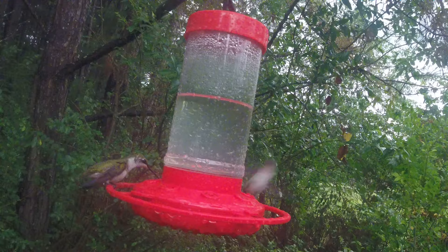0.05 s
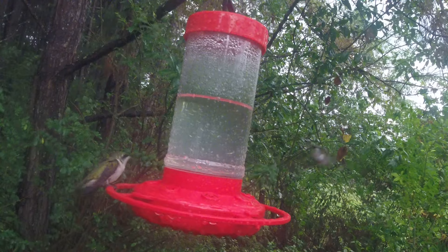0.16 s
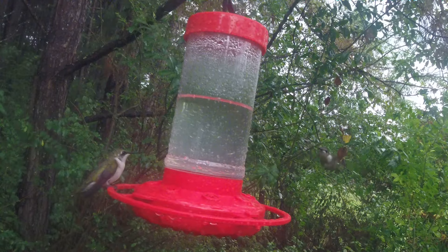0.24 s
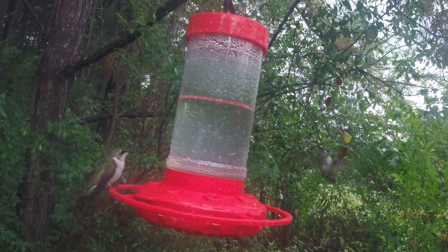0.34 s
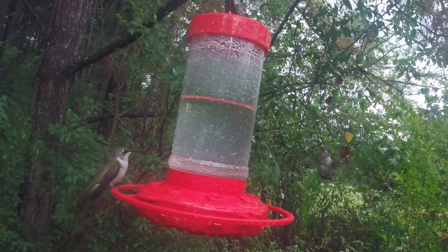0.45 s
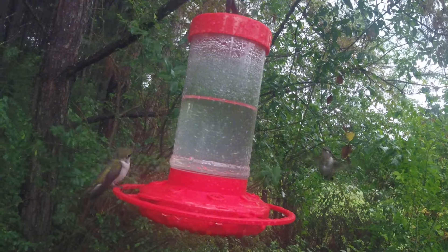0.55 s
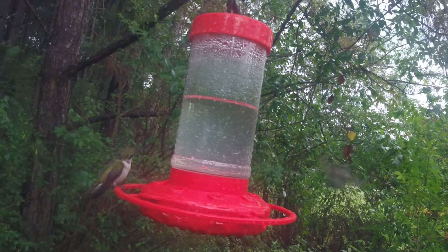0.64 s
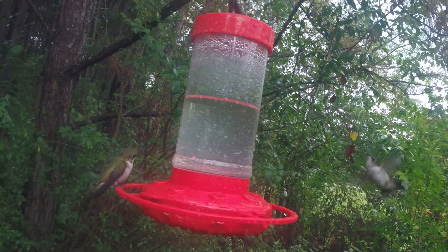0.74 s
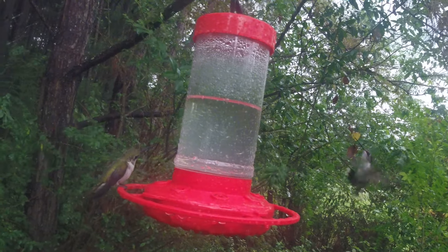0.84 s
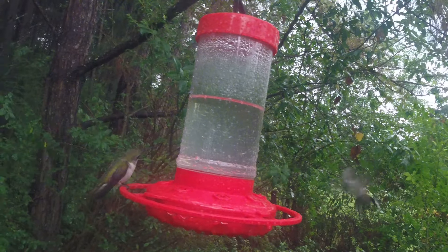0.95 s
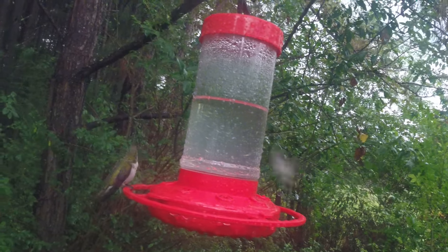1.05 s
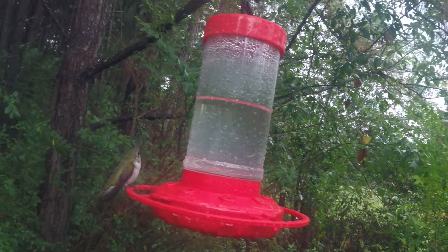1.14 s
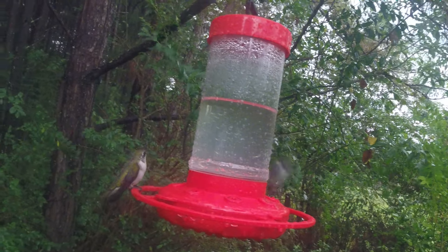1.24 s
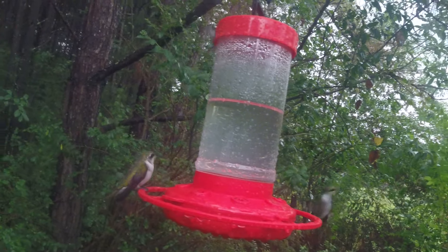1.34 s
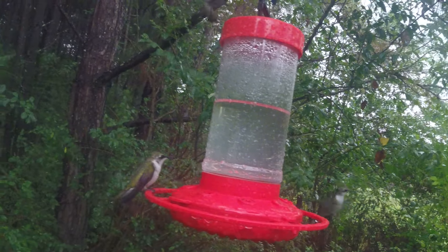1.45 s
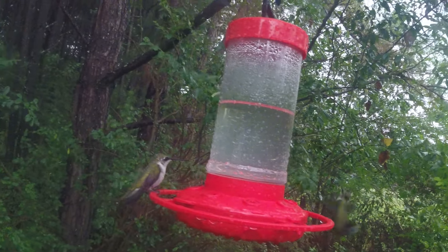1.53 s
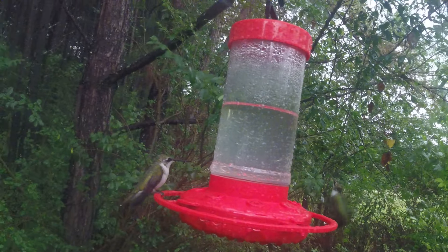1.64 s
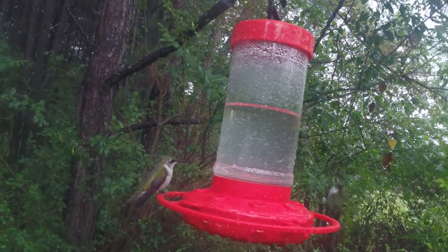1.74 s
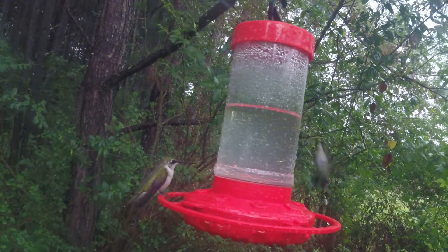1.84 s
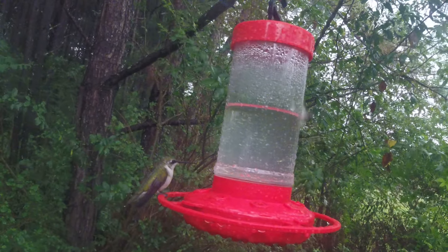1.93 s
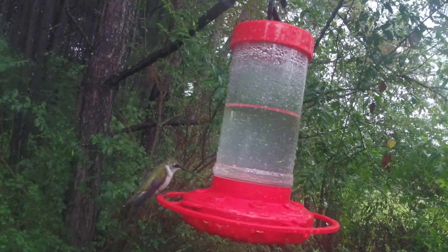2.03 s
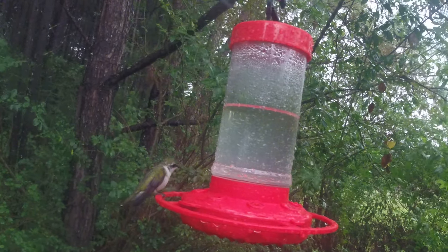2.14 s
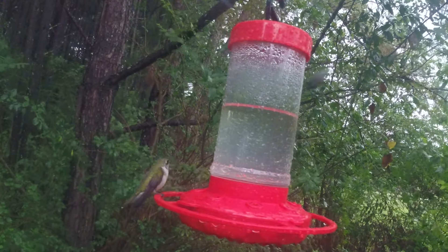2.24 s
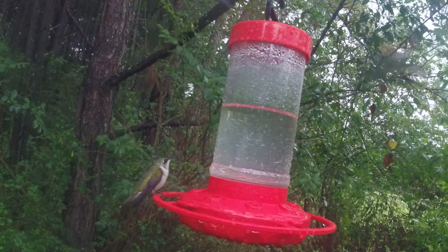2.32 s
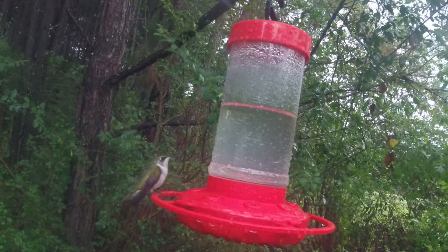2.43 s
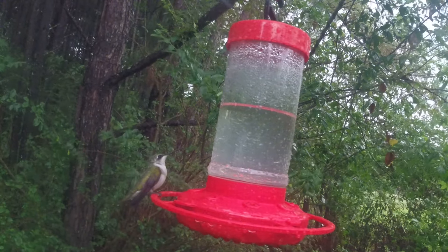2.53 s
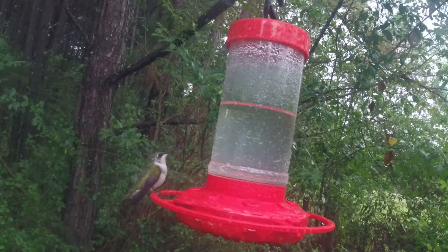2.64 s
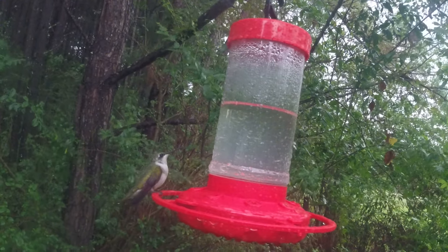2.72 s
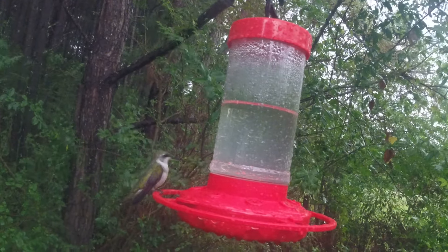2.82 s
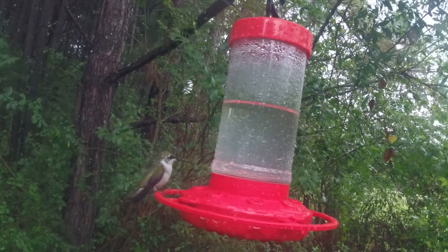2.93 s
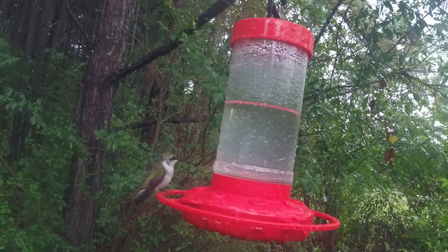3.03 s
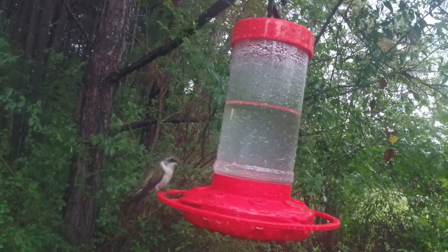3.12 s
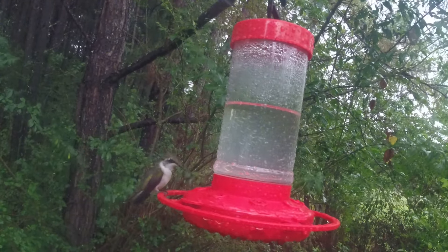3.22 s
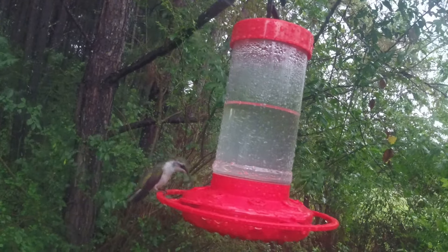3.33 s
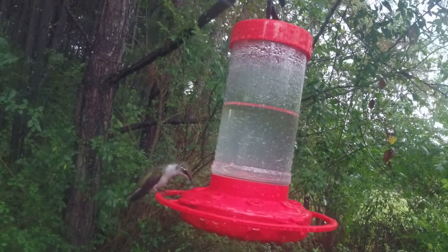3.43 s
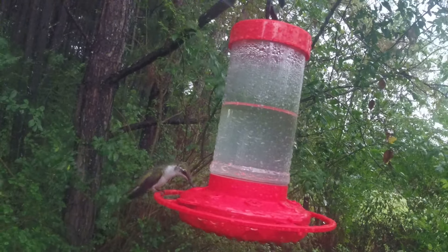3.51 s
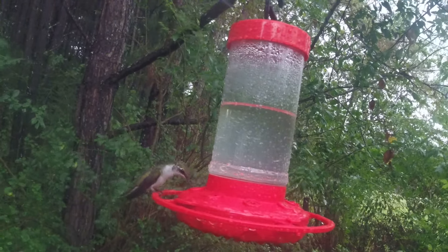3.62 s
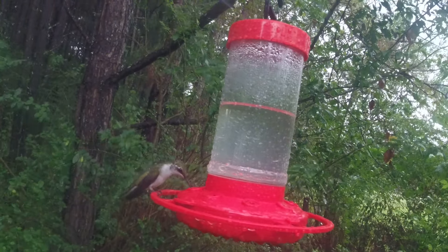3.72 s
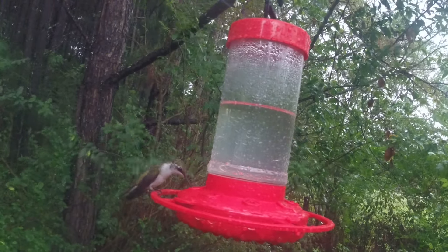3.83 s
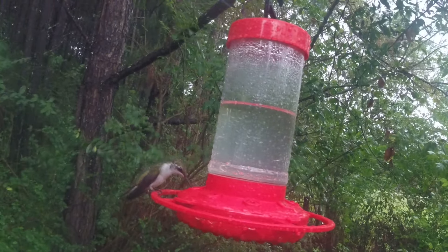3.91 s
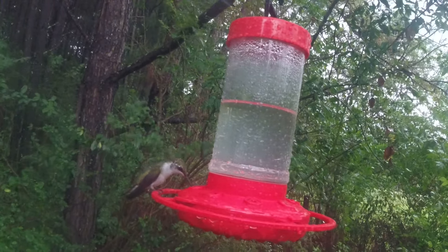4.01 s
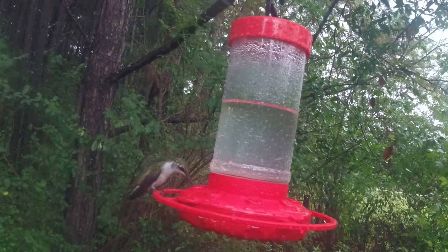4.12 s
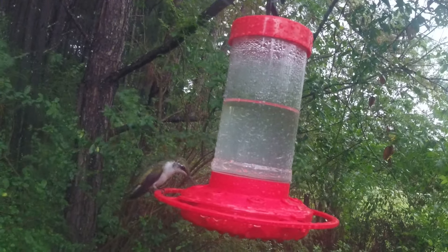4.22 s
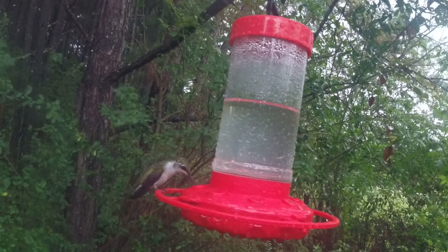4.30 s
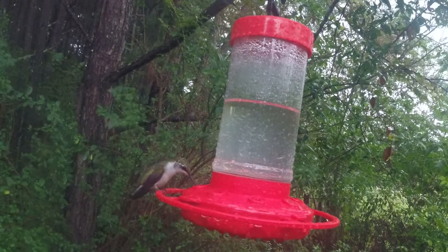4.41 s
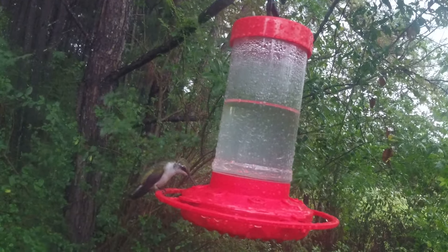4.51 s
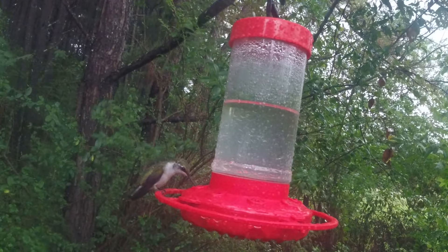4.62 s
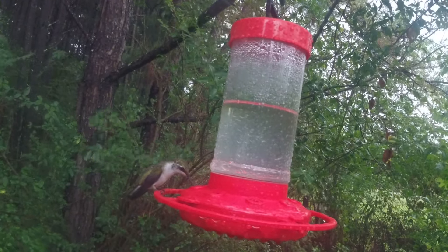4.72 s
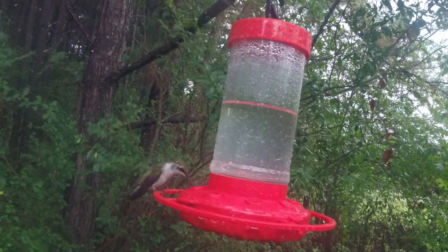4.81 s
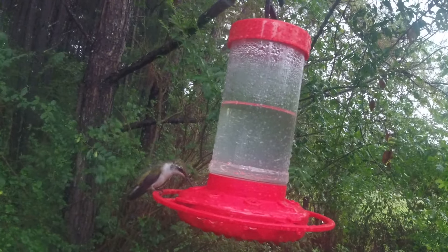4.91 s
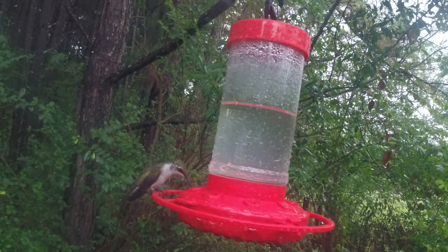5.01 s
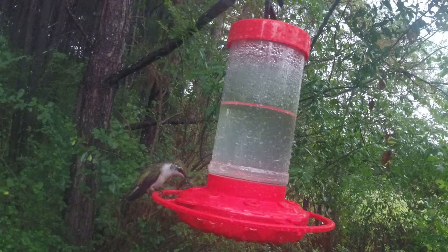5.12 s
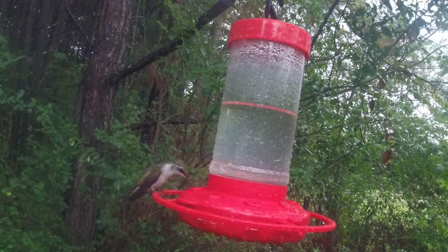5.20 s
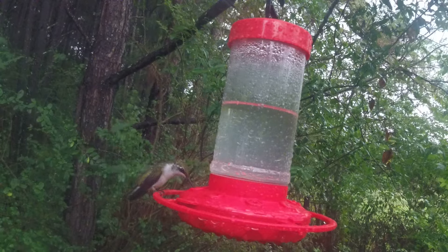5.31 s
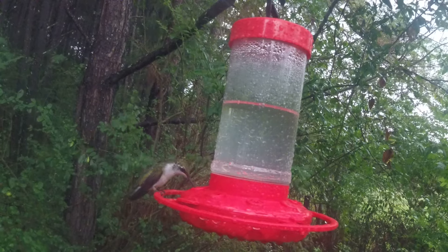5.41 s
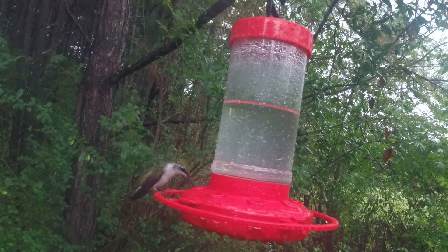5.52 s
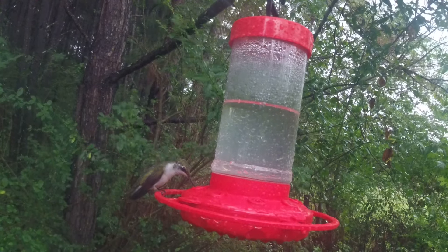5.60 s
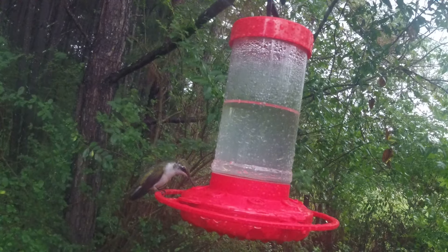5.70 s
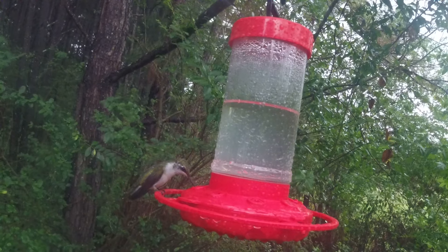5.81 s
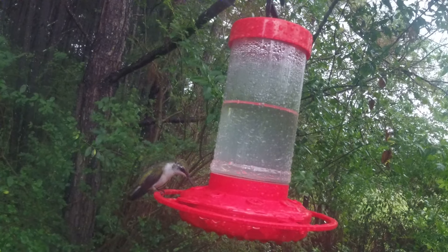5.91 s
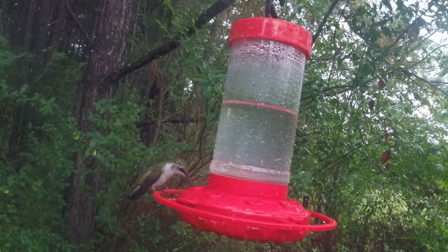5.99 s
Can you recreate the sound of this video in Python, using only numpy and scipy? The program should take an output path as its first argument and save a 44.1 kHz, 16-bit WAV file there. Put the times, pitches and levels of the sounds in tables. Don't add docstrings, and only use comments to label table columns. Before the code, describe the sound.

Hummingbird wings hum and buffet a close microphone in light rain, drops tick on leaves and plastic, a near bird chatters, another trills far off.

```python
import sys
import numpy as np
from scipy import signal
from scipy.fft import rfft, irfft, next_fast_len
from scipy.io import wavfile
from scipy.ndimage import uniform_filter1d, minimum_filter1d, map_coordinates

SR = 44100
rng = np.random.default_rng(int(sys.argv[2]) if len(sys.argv) > 2 else 0)


def ratio(d):
    e = np.asarray(d, float) / 20
    return 10 ** e


def transcribe(signal):
    frames = np.atleast_2d(signal).T
    limited = np.clip(frames, -1, 1)
    pcm = np.round(limited * 32767).astype(np.int16)
    wavfile.write(sys.argv[1], SR, pcm)


N = 266849
TIME = np.arange(N) / SR


def unit(x):
    return x / np.sqrt(np.mean(np.abs(x) ** 2) + 1e-20)


def along(points, hz):
    point_hz, level_db = np.transpose(points)
    return np.interp(np.log(hz + 1), np.log(point_hz + 1), level_db)


def curves(rows):
    start_s, *columns = np.transpose(rows)
    return [np.interp(TIME, start_s, column) for column in columns]


def swells(start_s, half_s):
    away_s = TIME - np.asarray(start_s)[:, None]
    return np.exp(-(away_s / np.reshape(half_s, (-1, 1))) ** 2)


def wobble(rate):
    knots = rng.standard_normal(int(N * 400 / SR))
    return unit(map_coordinates(knots, [TIME * min(rate, 390)]))


def noise(spectrum):
    size = next_fast_len(N + 8192)
    white = rfft(rng.standard_normal(size))
    colour = ratio(along(spectrum, np.fft.rfftfreq(size, 1 / SR)))
    return unit(irfft(white * colour, size)[:N])


def evened(x, seconds, share):
    power = np.abs(uniform_filter1d(np.abs(x) ** 2, max(int(seconds * SR), 2))) + .02
    return unit(x * power ** (-np.clip(share, 0, 1) / 2))


def butter(order, hz, kind):
    return signal.butter(order, hz, kind, fs=SR, output="sos")


def add(x, start_s, piece):
    seat = x[max(round(start_s * SR), 0):][:len(piece)]
    seat += piece[:len(seat)]


def echoes(x, t60, wet_db):
    t = np.arange(SR // 4) / SR
    tail = ratio(-60 * t / t60) * rng.standard_normal(len(t))
    tail /= np.linalg.norm(tail)
    return x + ratio(wet_db) * signal.fftconvolve(np.pad(x, (200, 0)), tail)[:N]


# pitch_hz [Hz], level_db [dB per Hz]
HUM_COLOUR = [(56, -53), (95, -57), (107, -21), (142, 0.5), (183, -6), (228, -4.5), (340, -18.5),
              (440, -33.5), (750, -120)]
# pitch_hz [Hz], level_db [dB per Hz]
HEAVE_COLOUR = [(10, -17), (20, -2.5), (45, -4.5), (65, -5.5), (85, -22), (200, -120)]
# pitch_hz [Hz], level_db [dB per Hz]
THUD_COLOUR = [(25, -120), (50, -34), (68, 2.5), (112, -5), (140, -9), (300, -26), (600, -120)]
# pitch_hz [Hz], level_db [dB per Hz]
FLUTTER_COLOUR = [(130, -120), (240, -20), (320, 2.5), (450, -3), (650, -15.5), (1000, -47.5)]


def air():
    hum_db, hum_hz, heave_db, thud_db, flutter_db = flow()
    eddies = evened(wobble(60) + 1j * wobble(60), seconds=.06, share=.7)
    swirl = evened(wobble(150) + 1j * wobble(150), seconds=.15, share=.1)
    turns = 2j * np.pi * np.cumsum(hum_hz) / SR
    shed = unit(np.real(eddies * np.exp(turns) + .6 * swirl * np.exp(.9 * turns)))

    narrow = np.clip((np.maximum(hum_db, heave_db + 9) + 42) / 20, .05, .95)
    broad = evened(noise(HUM_COLOUR), seconds=.15, share=.68)
    hum = ratio(hum_db) * (np.sqrt(narrow) * shed + np.sqrt(1 - narrow) * broad)
    hum = signal.sosfiltfilt(butter(6, 130, "highpass"), hum)
    octave = signal.sosfiltfilt(butter(4, 220, "highpass"), hum ** 2)

    heave = ratio(heave_db) * evened(noise(HEAVE_COLOUR), seconds=.11, share=.45)
    thud = ratio(thud_db) * evened(noise(THUD_COLOUR), seconds=.093, share=1)
    flutter = ratio(flutter_db + 2.1 * wobble(25)) * noise(FLUTTER_COLOUR)
    return hum + .34 * octave + heave + thud + flutter


# start_s [s], flow_db [dB], pitch_hz [Hz], gust_db [dB]
AIR_FLOW = [(0, -25, 170.6, -75), (0.3, -32, 169.4, -62), (0.6, -31, 179.1, -56), (0.85, -34, 191, -59),
            (1.1, -37.5, 178.4, -59), (1.4, -25.5, 200, -48), (1.62, -26, 152, -42),
            (1.85, -23.5, 200.9, -38), (2.1, -23, 199.2, -30), (2.28, -17, 255.4, -27.5),
            (2.45, -20, 148.5, -37), (2.65, -28, 163.7, -25), (2.92, -37, 146.2, -43),
            (3.1, -37.5, 145.3, -26.5), (3.36, -40, 151.4, -45.5), (4.0, -43.5, 176.7, -52.5),
            (5.0, -42, 171.2, -61), (6.05, -43, 180.4, -71)]
# start_s [s], lift_db [dB], half_width_s [s], pitch_hz [Hz]
WING_PUFFS = [(0.09, -5, 0.037, 171.1), (0.317, 8.5, .012, 200.5), (0.44, 3.5, .025, 199.8),
              (0.6, -3, .015, 189.6), (1.88, 3, 0.025, 199.4), (2.28, 0.5, 0.022, 259.9),
              (0.128, 8.5, 0.02, 177.4), (0.191, 6, 0.036, 201.3), (0.5, 0, 0.043, 170.5),
              (0.672, 6.5, 0.053, 225.6), (0.83, -10.5, 0.028, 228.9), (1.025, 4.5, 0.04013, 215.6),
              (1.14, -0.5, .03, 218.3), (1.208, 10.5, 0.024, 222.2), (1.259, -6, 0.012, 216.5),
              (1.307, 14, 0.03, 195.5), (1.447, 14.5, 0.034, 204.4), (1.59, 5.5, 0.048, 156.8),
              (1.659, -6, 0.025, 149), (1.739, 3, 0.046, 187), (1.802, -10.5, 0.011, 209),
              (2.0, 2.5, 0.017, 211.8), (2.03, 5, 0.016, 211.1), (2.225, 5.5, 0.031, 245.4),
              (2.351, 6.5, 0.0308, 186.7), (2.57, -9, 0.045, 148.8), (2.67, 6, .025, 171.1),
              (2.77, 2, 0.037, 137), (3.03, 8, 0.042, 137), (5.17, 5.5, .03, 178.2),
              (5.41, 3.5, 0.059, 155.8), (5.729, 3, 0.054, 194.4)]
# start_s [s], lift_db [dB], quick_over_slow_db [dB]
GUST_SHOVES = [(0.12, 6, -12), (0.5, 0, -6), (1.3, -11, -8), (1.8, 2.5, 15), (2.029, -2, 22),
               (2.17, 0.5, 0), (2.22, -4, 9), (2.351, 6, -1), (2.4, -12, 13), (2.45, 6.5, -16),
               (2.57, -1, 10), (3.029, 5.5, 10), (3.19, 3.5, -8), (3.759, -4, -23), (4.37, -3, -11),
               (4.59, -5, -1), (5.17, 1, -6), (5.64, -5, 0)]
# start_s [s], flutter_lift_db [dB]
FEATHERS_NEAR = [(0, 8), (0.6, 3), (1.1, 2), (1.4, 0.5), (1.7, 1), (2.2, -0.5), (2.6, 1), (3.2, 5),
                 (4.0, 0.5), (6.05, 0.5)]


def flow():
    flow_db, hum_hz, gust_db = curves(AIR_FLOW)
    start_s, lift_db, half_s, puff_hz = np.transpose(WING_PUFFS)
    bells = swells(start_s, half_s)
    hum_db = flow_db + lift_db @ bells
    pull = np.clip(1.5 * bells, 0, 1)
    pulled = pull.sum(0)
    hum_hz = hum_hz + (puff_hz @ pull - hum_hz * pulled) / np.maximum(pulled, 1)

    start_s, lift_db, quick_db = np.transpose(GUST_SHOVES)
    bells = swells(start_s, half_s=.042)
    gust_db = gust_db + lift_db @ bells
    tip_db = (-3 + quick_db @ bells) / 2

    flutter_db = -56 + .29 * (hum_db + 41.5) + .0974 * (hum_hz - 170) + curves(FEATHERS_NEAR)[0]
    return hum_db, hum_hz, gust_db - tip_db, gust_db + tip_db, flutter_db


# start_s [s], peak_db [dB], pitch_hz [Hz], rattle_db [dB], sharpness_db [dB]
NEAR_DROPS = [(0.294, -34, 1490, -10, -3), (0.565, -26.5, 1152, 1.5, -18), (0.7472, -32, 1350, -4, -4),
              (0.856, -18, 1300, -14, 2), (0.883, -34, 1119, -8, -1), (0.895, -27, 970, -11, -3),
              (0.952, -31.5, 974, -5, -2.5), (0.979, -35, 968, -5.5, 1.5), (1.079, -29, 2245, -0.5, -1),
              (1.102, -36, 2142, -4, 1), (1.125, -22.5, 1667, -5, -2.5), (1.422, -34, 1490, -9, 6),
              (1.761, -35, 1300, -6, 4.5), (1.929, -26, 1099, -11.5, 5.5), (2.227, -28, 3001, -12, 6),
              (2.252, -37, 1500, 1, 0), (2.459, -27.5, 1038, -4.5, 2.5), (2.72, -32.5, 944.4, -7, 1),
              (2.804, -30.5, 2380, -22, 5.5), (2.8567, -30, 2396, -9, 4), (3.035, -13.5, 1150, -12.5, -0.5),
              (3.125, -37.5, 917, -1, 1), (3.181, -26.5, 1651, -4.5, -5), (3.504, -30.5, 798, -10, -20),
              (4.044, -36.5, 913, -4, 1.5), (4.967, -35, 1320, -3, 1), (5.047, -35, 1876, -9, -1),
              (5.242, -22.5, 1490, -10, 5), (5.515, -32, 1638, -8, -11), (5.753, -32, 2140, -4.5, -1.5)]
# start_s [s], peak_db [dB]
SMALL_DROPS = [(0.389, -47), (0.625, -39), (0.658, -39), (0.7739, -35), (1.111, -37), (1.142, -32.5),
               (1.169, -36), (1.503, -41), (1.545, -42), (1.395, -48), (1.818, -48), (2.152, -44),
               (2.128, -40), (1.481, -40), (1.642, -39), (1.711, -41), (1.835, -38.5), (1.899, -37),
               (1.955, -36.5), (2.159, -35), (2.429, -40), (2.464, -48), (2.777, -44), (2.8015, -51),
               (2.866, -47), (3.02, -45.5), (3.0325, -37), (3.046, -37), (3.606, -39), (3.661, -39),
               (4.097, -42), (4.809, -38.5), (4.9493, -45), (5.017, -44), (5.253, -36.5), (5.333, -49),
               (5.555, -42), (5.747, -46), (5.899, -55), (5.991, -45)]


def drops():
    out, t = np.zeros(N), np.arange(SR // 20) / SR
    leaf_band = butter(2, [250, 2600], "bandpass")
    spray_band = butter(2, [4000, 11000], "bandpass")
    soft = butter(2, 2000, "lowpass")
    late = np.clip(t - .0012, 0, 1)
    small = [(s, db, 2000 * ratio(rng.normal(0, 2.9)), -.5, 0) for s, db in SMALL_DROPS]
    rattle_fade = ratio(-60 * late / .018) + .17 * ratio(-60 * late / .1)
    rattle_fade *= 1 - np.exp(-late / .0003)
    spray_fade = ratio(-60 * late / .0029) * (late > -.0003)

    for start_s, peak_db, ring_hz, rattle_db, sharp_db in NEAR_DROPS + small:
        u = (t - .0014) * np.sqrt(ring_hz * 3800)
        push = np.cos(1.5 * np.pi * u - .6) * np.exp(-(u / .4) ** 2)
        push += .2 * np.sin(.6 * np.pi * u) * np.exp(-(u / 1.5) ** 2)
        ring = .09 * np.sin(2 * np.pi * ring_hz * late) * ratio(-60 * late / .015)
        hiss = rng.standard_normal((2, len(t)))
        rattle = unit(signal.sosfilt(leaf_band, hiss[0])) * rattle_fade
        spray = unit(signal.sosfilt(spray_band, hiss[1])) * spray_fade
        spray_db = -17 - .95 * (peak_db + 40)
        hit = push + ring + ratio(rattle_db - 4) * rattle + ratio(spray_db) * spray
        body = signal.sosfiltfilt(soft, hit)
        add(out, start_s, ratio(peak_db) * (body + ratio(sharp_db) * (hit - body)))
    return out


# start_s [s], pitch_hz [Hz], level_db [dB], t60_s [s]
PLASTIC_RINGS = [
    (3.0374, 2037, -29.5, 0.022),
    (0.565, 1092, -36, 0.021),
    (0.857, 1290, -38, 0.04),
    (1.931, 940, -40, 0.062),
    (5.049, 709, -35, 0.027),
    (5.048, 1834, -41, 0.047),
    (5.754, 2170, -37, 0.015),
]


def feeder():
    out, t = np.zeros(N), np.arange(SR // 10) / SR
    for start_s, pitch_hz, level_db, t60 in PLASTIC_RINGS:
        add(out, start_s, ratio(level_db - 60 * t / t60) * np.sin(2 * np.pi * pitch_hz * t))
    return out


# start_s [s], pitch_hz [Hz], level_db [dB]
HIGH_PEEP = [(2.432, 6940, -60), (2.437, 6975, -45), (2.455, 7010, -41), (2.462, 7080, -36),
             (2.474, 7075, -37), (2.478, 7060, -40), (2.482, 7050, -36), (2.490, 7020, -42),
             (2.495, 6950, -50)]
# start_s [s], length_s [s], start_hz [Hz], end_hz [Hz], level_db [dB]
QUICK_FLICKS = [
    (2.494, 0.0072, 6900, 2000, -33),
    (2.537, 0.0057, 1890, 6700, -30.5),
    (2.5535, 0.0075, 1890, 6540, -29),
]
# start_s [s], length_s [s], start_hz [Hz], end_hz [Hz], level_db [dB]
HOOKED_CLICKS = [
    (2.9245, 0.0068, 1930, 6270, -33),
    (2.939, 0.0082, 2110, 6280, -30),
    (2.9545, 0.006, 3400, 6360, -27.5),
    (2.969, 0.0038, 2340, 6490, -30),
    (2.9845, 0.0062, 2770, 6500, -30),
]


def chatter():
    song = whistle(HIGH_PEEP, rough_db=.3, waver_hz=0) + slurs(bright_db=2.5)
    song += notes(QUICK_FLICKS[:1], knee=.35, reach=.12, rise=.075, fall=.3, bright_db=0)
    song += notes(QUICK_FLICKS[1:], knee=.75, reach=.86, rise=.074, fall=.35, bright_db=4)
    song += notes(HOOKED_CLICKS, knee=.394, reach=.9, rise=.045, fall=.67, bright_db=1.5)
    return echoes(song, t60=.09, wet_db=-19)


def notes(rows, knee, reach, rise, fall, bright_db):
    out = np.zeros(N)
    for start_s, length_s, start_hz, end_hz, level_db in rows:
        knee_hz = start_hz + reach * (end_hz - start_hz)
        u = np.linspace(0, 1, int(length_s * SR))
        pitch_hz = np.interp(u, [0, knee, 1], [start_hz, knee_hz, end_hz])
        pitch_hz = uniform_filter1d(pitch_hz, size=len(u) // 4, mode="nearest")
        shape = np.clip(u / rise, 0, 1) * np.clip((1 - u) / fall, 0, 1)
        add(out, start_s, ratio(level_db) * voice(pitch_hz, bright_db) * shape)
    return out


# start_s [s], pitch_hz [Hz], level_db [dB]
NASAL_SLURS = [
    [(2.737, 2750, -50), (2.741, 2550, -38), (2.750, 2150, -36), (2.758, 2000, -35), (2.7615, 1750, -38),
     (2.763, 1550, -52)],
    [(2.818, 2700, -48), (2.823, 2340, -32), (2.832, 2280, -31), (2.836, 2050, -34), (2.841, 1750, -37),
     (2.844, 1400, -50)],
    [(2.568, 2000, -50), (2.5695, 2000, -35), (2.571, 1950, -37), (2.573, 1900, -52)],
]


def slurs(bright_db):
    out = np.zeros(N)
    for rows in NASAL_SLURS:
        s, pitch_hz, level_db = np.transpose(rows)
        t = np.arange(s[0], s[-1], 1 / SR)
        tone = voice(np.interp(t, s, pitch_hz), bright_db)
        add(out, s[0], ratio(np.interp(t, s, level_db)) * tone)
    return out


OVERTONE_LEVELS = [-5.5, -10, -19, -19]
# pitch_hz [Hz], level_db [dB]
THROAT_COLOUR = [(1500, 0), (4000, -5.5), (5200, -6), (6200, -0.5), (7200, -15), (9000, -10.5),
                 (14000, -21)]


def voice(pitch_hz, bright_db):
    phase = 2 * np.pi * np.cumsum(pitch_hz) / SR
    out = np.zeros(len(phase))
    for k, level_db in enumerate([0] + [db + bright_db for db in OVERTONE_LEVELS], 1):
        level = ratio(level_db + along(THROAT_COLOUR, k * pitch_hz))
        out += level * (k * pitch_hz < SR / 3) * np.sin(k * phase)
    return out


def whistle(rows, rough_db, waver_hz):
    pitch_hz, level_db = curves(rows)
    phase = 2 * np.pi * np.cumsum(pitch_hz + waver_hz * wobble(120)) / SR
    sounding = (TIME > rows[0][0]) & (TIME < rows[-1][0])
    tone = np.sin(phase) + .025 * np.sin(2 * phase)
    return np.sqrt(2) * ratio(level_db + rough_db * wobble(90)) * sounding * tone


# start_s [s], notes_so_far [count], level_db [dB]
FAR_TRILL = [(0.0839, 0, -65), (0.5205, 5, -64), (0.611, 6, -58), (0.703, 7, -59), (0.795, 8, -57.5),
             (0.885, 9, -59), (1.07, 11, -63), (1.1636, 12, -58), (1.345, 14, -58.5), (1.7933, 19, -64.5),
             (2.2524, 24, -57), (2.6078, 28, -60.5), (3.3449, 36, -57.5), (3.62, 39, -49.2),
             (3.8995, 42, -53), (4.188, 45, -53.5), (4.368, 47, -53.2), (4.555, 49, -47.2),
             (4.7445, 51, -47.3), (5.0255, 54, -56.5), (5.3134, 57, -53.5), (5.5102, 59, -57.5),
             (5.802, 62, -57), (5.992, 64, -55.5)]
# start_s [s], pitch_hz [Hz], level_db [dB]
FAR_WHISTLES = [
    [(.4, 3300, -78), (.5, 3350, -74), (.6, 3280, -75), (.68, 3150, -79)],
    [(4.35, 2740, -68), (4.42, 2910, -61), (4.47, 3090, -56), (4.51, 3250, -58), (4.55, 3440, -60),
     (4.61, 3500, -59), (4.67, 3540, -62), (4.72, 3470, -72)],
]


def far_birds():
    trill, u = np.zeros(N), np.linspace(0, 1, int(.04 * SR))
    when_s, sung, level_db = np.transpose(FAR_TRILL)
    count = np.arange(sung[-1] + 1)
    for start_s, db in zip(np.interp(count, sung, when_s), np.interp(count, sung, level_db)):
        top, bottom, fade = rng.normal(0, 1, 3)
        pitch_hz = 7100 * (1 + .008 * top) - 3450 * (1 + .015 * bottom) * u - 900 * u ** 6
        skew = np.clip(1 + (-50.5 - db) / 14, 1, 1.8)
        ripple_db = 1.8 * np.cos(2 * np.pi * (2.2 * u + .047 * fade) + 3.1)
        shape = np.sin(np.pi * u ** skew) ** .76 * ratio(ripple_db)
        tone = np.sin(2 * np.pi * np.cumsum(pitch_hz) / SR)
        add(trill, start_s - .0035, ratio(db + .2 + .3 * (db + 60)) * shape * tone)
    trill *= ratio(2.2 * wobble(200))

    distant = sum(whistle(rows, rough_db=3.5, waver_hz=32) for rows in FAR_WHISTLES)
    distant += .45 * np.pad(distant, (int(.09 * SR), 0))[:N]
    return echoes(trill, t60=.15, wet_db=-14) + ratio(-2) * echoes(distant, t60=.2, wet_db=-1)


# pitch_hz [Hz], level_db [dB per Hz]
RAIN_COLOUR = [(260, -23), (450, -1.5), (712, 1.5), (838, -1.5), (2700, -7), (4200, -9), (5650, -15),
               (6270, -12), (10100, -18.5), (13300, -28.5), (15500, -28)]


def far_rain():
    rain_db = -51.5
    draw = rng.random((2400, 3))
    sizes_db = rain_db - 3 - 4.5 * np.log(1 - .97 * draw[:, 1])
    pitch_hz = 900 * 6 ** draw[:, 2]
    patter = ticks(draw[:, 0] * N / SR, sizes_db, pitch_hz, cycles=1)
    patter = signal.sosfilt(butter(3, 350, "highpass"), patter)
    return ratio(rain_db + .1 * wobble(.46) + .78 * wobble(12)) * noise(RAIN_COLOUR) + patter


def ticks(start_s, level_db, pitch_hz, cycles):
    k = np.arange(192)
    turns = pitch_hz[:, None] * k / SR
    rows = ratio(level_db)[:, None] * np.sin(2 * np.pi * turns) * np.exp(-turns / cycles)
    seats = (start_s * SR).astype(int)[:, None] + k
    return np.bincount(seats.ravel(), rows.ravel(), N + len(k))[:N]


def scene():
    near = air() + drops() + feeder() + chatter()
    return (near + far_birds() + far_rain())[None]


def band_limit(x):
    return signal.sosfilt(signal.butter(12, 15330, fs=SR, output="sos"), x)


def record(dry):
    peak = -minimum_filter1d(-np.abs(dry), size=900)
    reach = uniform_filter1d(peak, size=900)
    limited = dry / (1 + (reach / .5) ** 4) ** (1 / 4)
    return band_limit(signal.sosfilt(butter(12, 15300, "lowpass"), limited))


dry = scene()
out = record(dry)
transcribe(out)
```